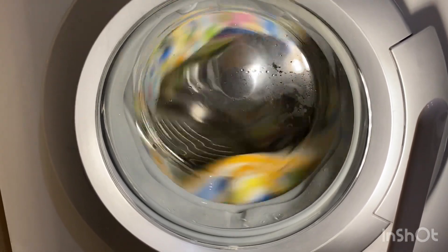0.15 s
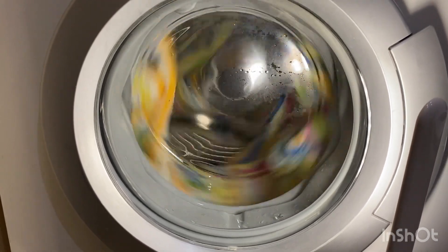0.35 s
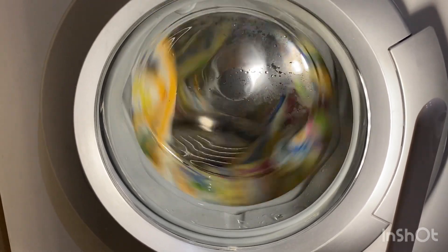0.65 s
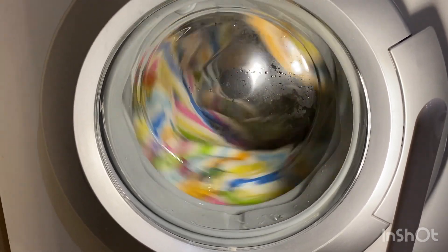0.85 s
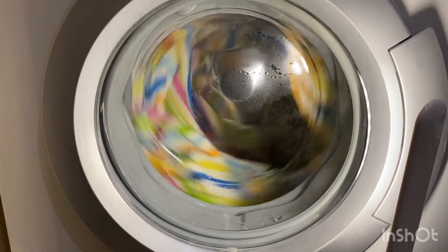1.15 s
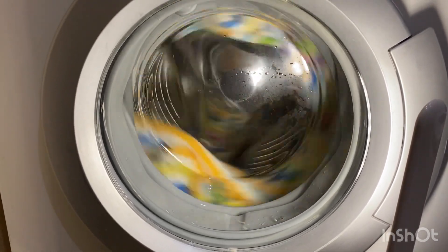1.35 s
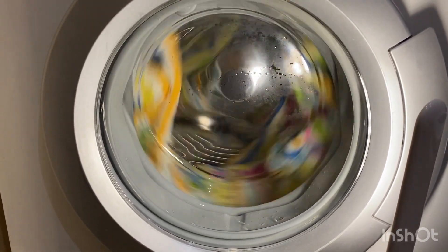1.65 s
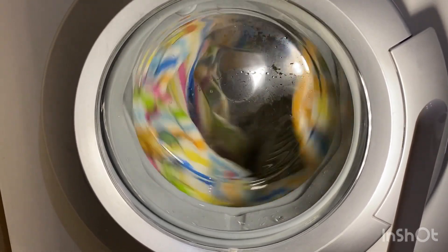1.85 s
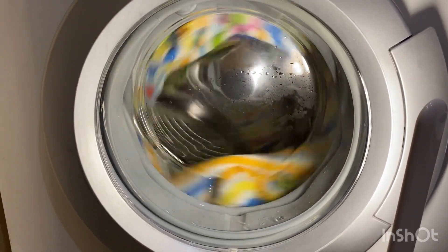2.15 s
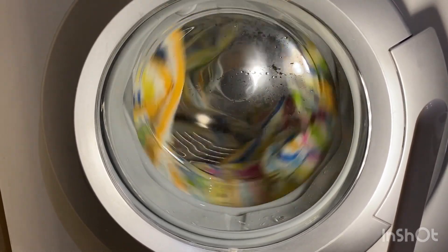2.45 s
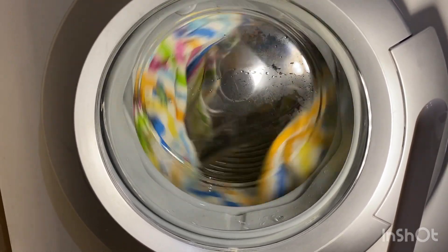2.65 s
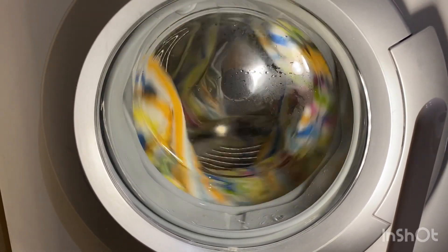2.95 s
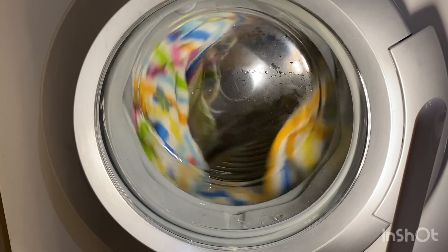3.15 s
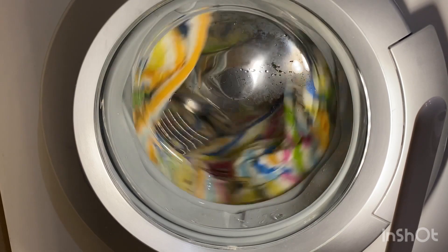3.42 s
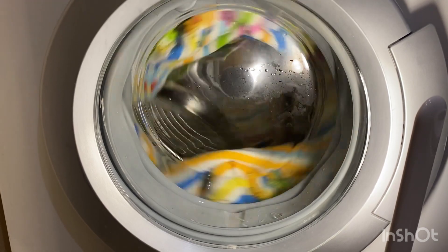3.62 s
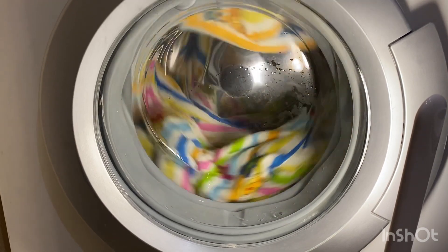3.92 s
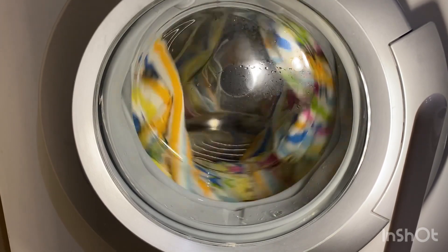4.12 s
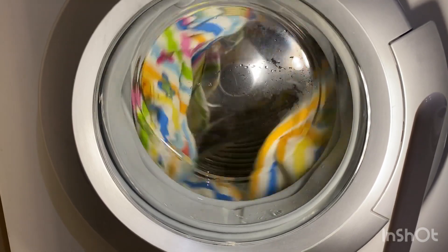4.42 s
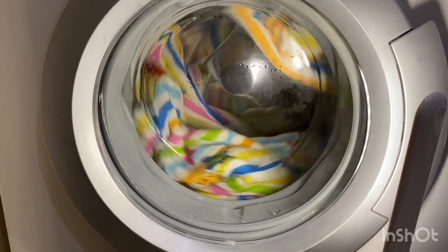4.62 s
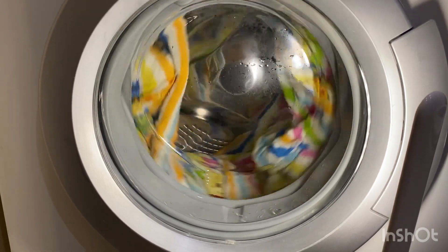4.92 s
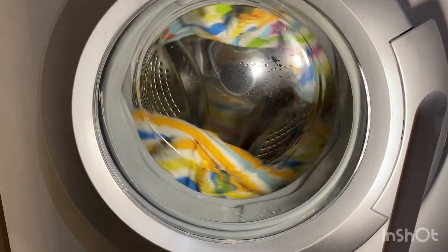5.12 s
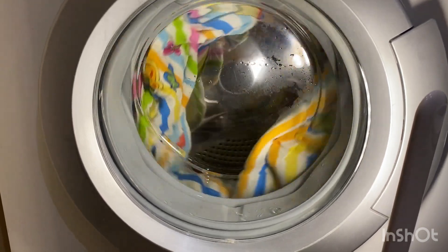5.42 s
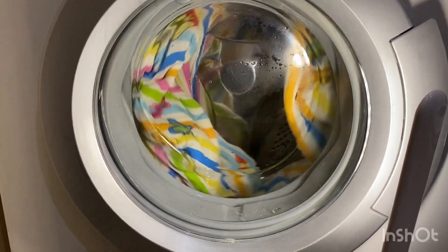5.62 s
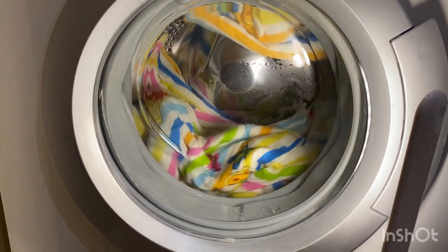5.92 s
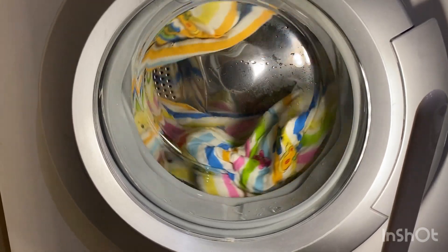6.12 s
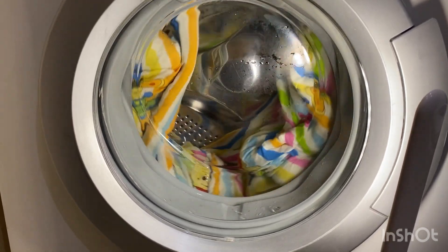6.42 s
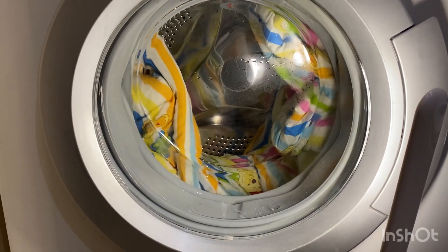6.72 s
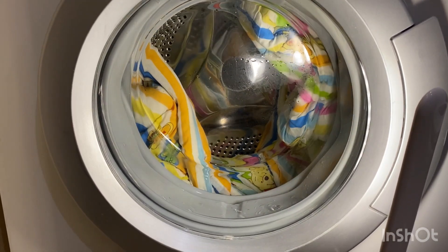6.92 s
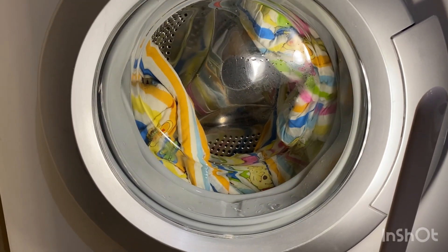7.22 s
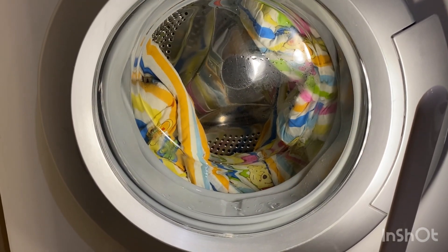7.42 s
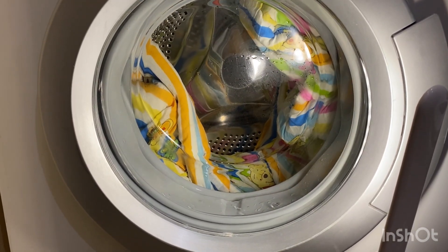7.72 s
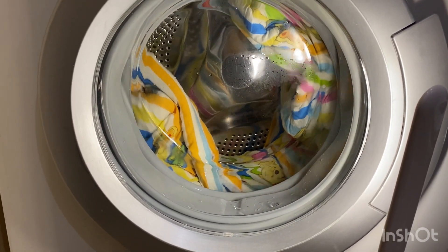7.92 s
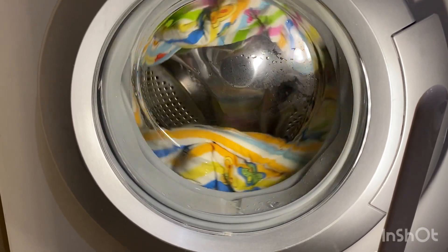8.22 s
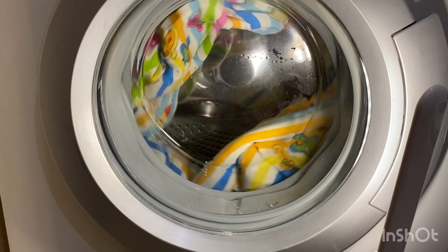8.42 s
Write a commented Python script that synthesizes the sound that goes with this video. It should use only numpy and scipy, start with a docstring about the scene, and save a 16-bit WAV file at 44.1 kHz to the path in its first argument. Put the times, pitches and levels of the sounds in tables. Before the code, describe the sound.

Indoors, close in front of a front-loading washing machine at the end of a spin. From 0 s, a drain pump gives a deep 100 Hz mains hum that swells irregularly, two to four times a second, with each gulp of water; strong gulps near 1.7, 4.4, 7.7 and 8 s add a rough buzz. Between them comes loose rattling. Churning water, brighter gushes and fine bubbly hiss run throughout, with short wet spits near 2.7, 3.4, 4.6, 6.5 and 8 s. Soft hollow tub booms appear near 1.7, 3.9, 5.2 and 6 s. Meanwhile the motor's thin whine and brush hiss glide downward from the start, fading until the drum stops around 6.8 s. The pump continues alone. At 7.57 s a sharp relay snap bounces and rings briefly in the small room; a faint steady 300 Hz hum follows, and the drum slowly turns from 7.9 s to the end at 8.5 s.

```python
"""A drain pump hums on 50 Hz mains, swelling with each gulp of water, amid churning, spray and rattles.
It empties a front-loading washing machine at the end of a spin, heard before its door in a small room.
The drum motor coasts down: shaft-locked tones fall in pitch and the hiss of its brushes fades.
Wet laundry booms in the tub as a narrow resonance; a relay snaps and the drum turns again.
Tones are summed cosines; water, brushes and snap are coloured noise."""
import sys
import numpy as np
from scipy import signal
from scipy.fft import rfft, irfft
from scipy.io import wavfile
from scipy.ndimage import uniform_filter1d

SR = 44100
rng = np.random.default_rng(int(sys.argv[2]) if len(sys.argv) > 2 else 0)


def file_out(sig):
    """Save sig as 16-bit WAV at sys.argv[1]."""
    # one column per channel
    cols = np.atleast_2d(sig).T
    # limit, then scale
    lim = np.clip(cols, -1, 1)
    pcm = np.round(lim * 32767).astype(np.int16)
    wavfile.write(sys.argv[1], SR, pcm)


N = 377496
TIME = np.arange(N) / SR
BINS = np.fft.rfftfreq(N, 1 / SR)
MAINS_HZ = 50.01
MAINS_RAD = 2 * np.pi * MAINS_HZ * TIME

# Cabinet and hose resonances. Each row: frequency in Hz, width in Hz, lift in dB.
CABINET_RESONANCES = [(91.4, 21.6, 14.5), (336.4, 16, 7.5), (352.4, 8.9, 5.5), (430.5, 11, 6),
                      (561, 44, 8.5), (660, 9, 1), (703, 26, 7.5), (753, 8.8, 6), (834, 29, 6),
                      (913.5, 18, 8), (1050, 15, 9), (1090, 16, 7.5), (1360, 235, 6), (1810, 17, 2)]


def gain_of(db):
    """Decibels to an amplitude factor."""
    return 10 ** (np.asarray(db) / 20)


def evened(x):
    """Scale to an rms of 1."""
    return x / np.sqrt(np.mean(abs(x) ** 2) + 1e-20)


def ease(x):
    """Smooth step from 0 to 1 as x goes from 0 to 1."""
    return np.sin(np.pi / 2 * np.clip(x, 0, 1)) ** 2


def swell(start_s, length_s, rise_s, fall_s):
    """Envelope that rises from start_s and falls once length_s has passed."""
    return ease((TIME - start_s) / rise_s) * ease(1 - (TIME - start_s - length_s) / fall_s)


def ring(start_s, t60_s):
    """Exponential decay of a blow at start_s, down 60 dB after t60_s."""
    age_s = np.maximum(TIME - start_s, 0)
    return (TIME >= start_s) * np.exp(-np.log(1000) * age_s / t60_s)


def read(points, hz):
    """Interpolate a spectrum table on a log-frequency axis."""
    point_hz, value = np.transpose(points)
    return np.interp(np.log(hz + 1), np.log(point_hz + 1), value)


def lift_db(resonances, at_hz):
    """Summed lift of resonance peaks at each frequency."""
    return sum(db / (1 + (2 * (at_hz - hz) / width_hz) ** 2) for hz, width_hz, db in resonances)


def curves(rows):
    """Interpolate each column of a time table, sample by sample."""
    s, *columns = np.transpose(rows)
    return [np.interp(TIME, s, column) for column in columns]


def wander(rate_hz):
    """Slow complex noise of about unit rms with a Gaussian spectrum about rate_hz wide."""
    points, end_s = 8192, TIME[-1]
    hz = np.fft.fftfreq(points, end_s / points)
    noise = rng.standard_normal((points, 2)) @ [1, 1j]
    slow = np.fft.ifft(np.fft.fft(noise) * np.exp(-(hz / rate_hz) ** 2 / 2))
    return np.interp(TIME, np.linspace(0, end_s, points), evened(slow))


def spread(pair, colour_db, ripple_db=3.5, ripple_hz=24):
    """Colour two unrelated signals; the room leaves the bass alike at both ears and the treble diffuse."""
    # Each row: frequency in Hz, correlation between the ears.
    ear_likeness = [(60, 1), (130, .99), (290, .9), (640, .5), (1400, .33), (3100, .37), (7000, .22),
                    (9000, 0), (16000, 0)]
    a, b = rfft(pair)
    same = np.clip(read(ear_likeness, BINS), -1, 1)
    mid, side = np.sqrt(1 + same) * a, np.sqrt(1 - same) * b
    # fine, fixed peaks and notches from reflections, different at each ear, strongest in the treble
    width_bins = int(ripple_hz / BINS[1]) + 1
    comb = evened(uniform_filter1d(rng.standard_normal((2, len(BINS))), width_bins))
    comb_db = ripple_db * comb * BINS ** 2 / (BINS ** 2 + 800 ** 2)
    out = irfft(np.array([mid + side, mid - side]) * gain_of(colour_db + comb_db), N)
    return out / out.mean(0).std()


def pump_load():
    """Each gulp fills the pump, holds and drains; the buzz gain falls faster as it needs a full pump."""
    # Gulps of water. Each row: start in s, length in s, filling in s, emptying in s,
    # hum level in dB, buzz level in dB before the buzz trim.
    gulps = [(-0.021, 0.158, 0.169, 0.221, -21.5, -44), (0.197, 0.171, 0.194, 0.2, -21.9, -45.5),
             (0.486, 0.157, 0.21, 0.31, -23.5, -48.5), (0.819, 0.11, 0.078, 0.265, -23, -44.8),
             (1.086, 0.17, 0.102, 0.174, -22, -43.5), (1.29, 0.328, 0.16, 0.128, -26.6, -54.2),
             (1.6, 0.261, 0.17, 0.144, -20, -37.0), (1.894, 0.155, 0.08, 0.14, -23.1, -49),
             (2.098, 0.181, 0.093, 0.074, -27, -57), (2.23, 0.29, 0.246, 0.203, -22, -41),
             (2.724, 0.304, 0.2, 0.056, -25.0, -51.9), (3.011, 0.111, 0.11, 0.149, -26.2, -46.9),
             (3.157, 0.143, 0.112, 0.258, -22.0, -43), (3.377, 0.15, 0.212, 0.21, -28.8, -44.7),
             (3.647, 0.095, 0.081, 0.197, -22.5, -40.4), (3.769, 0.169, 0.188, 0.23, -23.3, -47.1),
             (4.003, 0.34, 0.182, 0.082, -27, -72), (4.299, 0.264, 0.19, 0.148, -20, -37.0),
             (4.594, 0.131, 0.14, 0.332, -21.5, -43.5), (4.918, 0.186, 0.18, 0.16, -22.6, -45.1),
             (5.22, 0.582, 0.286, 0.31, -24.5, -54), (5.578, 0.096, 0.142, 0.115, -26.5, -36.5),
             (5.738, 0.234, 0.059, 0.056, -32.5, -45), (6.023, 0.323, 0.189, 0.253, -23.6, -46),
             (6.405, 0.22, 0.141, 0.27, -23.6, -50.5), (6.677, 0.29, 0.15, 0.33, -22.6, -43.9),
             (7.129, 0.245, 0.175, 0.143, -22.0, -44), (7.41, 0.183, 0.112, 0.167, -24.5, -49),
             (7.634, 0.14, 0.131, 0.361, -20.5, -37.5), (7.917, 0.178, 0.169, 0.218, -20.5, -36),
             (8.145, 0.202, 0.14, 0.194, -23.8, -45.5)]
    load, buzz = 0, 0
    for start_s, length_s, fill_s, empty_s, hum_db, buzz_db in gulps:
        gulp = swell(start_s, length_s, fill_s, empty_s)
        load = load + gain_of(hum_db) * gulp
        buzz = buzz + gain_of(buzz_db) * gulp ** 2
    return load, buzz


def pump_hum(load, swell_db, angle, waver_hz=3.45, tremble_db=0.8, tremble_hz=9, thrum_rad=0.75):
    """The magnet rotor throbs at twice the mains, nearly opposed to the stator's steady hum at light load."""
    # Steady harmonics. Each row: multiple of the mains, level in dB at usual load,
    # dB gained per dB of load, unsteady share.
    harmonics = [(3, -55.5, 0.2, 0.91), (6, -59, -0.9, 0.92), (8, -61.5, 0.1, 0.87),
                 (9, -58.5, -0.07, 0.65), (10, -61, 0.5, 0.43), (12, -60.5, 1.2, 0.98),
                 (14, -65.5, 2.2, 0.77), (16, -65.5, 1.5, 0.16)]
    # Unbalanced rotor, once a turn. Each row: time in s, level in dB at usual load.
    thrum_levels = [(0, -41), (1.3, -39), (2.5, -37.5), (4.5, -37), (8.56, -38)]
    stator_db, stator_rad = -36.5, 2.59
    tremble = gain_of(tremble_db * wander(tremble_hz).real)
    out = load * tremble * np.cos(2 * angle)
    out += gain_of(stator_db) * np.cos(2 * MAINS_RAD + stator_rad)
    thrum_db, = curves(thrum_levels)
    out += gain_of(thrum_db + 0.16 * swell_db) * np.cos(angle + thrum_rad)
    for order, db, follow, unsteady in harmonics:
        waver = evened(1 - min(unsteady, 1) + unsteady * wander(waver_hz))
        tone = waver * np.exp(1j * round(order) * MAINS_RAD)
        out += gain_of(db + follow * swell_db) * tone.real
    return np.sqrt(2) * out


def rotor_buzz(buzz, angle, buzz_trim_db=0.3, buzz_loose=0.36, idle_buzz_db=-52.5, idle_loose=0.99,
               idle_rattle_db=-51, rattle_loose=0.63, rattle_drift_rad=0.88, drift_hz=3.3,
               rise_s=0.041, fall_s=0.13):
    """The rotor has play: under load it knocks its stop, flattening hum crests into a fourth-harmonic buzz.
    In spells it rattles at the fifth harmonic, drifting in and out of step."""
    # Each row: start in s, length in s, level in dB before the idle rattle is added.
    rattles = [(0.454, 0.1, -47.5), (0.777, 0.46, -45.5), (1.442, 0.3, -44.5), (1.95, 0.43, -47),
               (2.787, 0.2, -45), (3.25, 0.21, -57), (4.044, 0.28, -44), (4.587, 0.065, -45),
               (4.878, 0.13, -44.5), (5.354, 0.091, -39.5), (6.086, 0.048, -41.5), (6.418, 0.28, -47.5),
               (7.214, 0.064, -40.5)]
    loaded = gain_of(buzz_trim_db) * buzz * evened(1 + buzz_loose * wander(drift_hz))
    idle = gain_of(idle_buzz_db) * evened(1 + idle_loose * wander(drift_hz))
    fourth = loaded + idle
    spells = sum(gain_of(db) * swell(s, length_s, rise_s, fall_s) for s, length_s, db in rattles)
    unsteady = evened(1 - rattle_loose + rattle_loose * wander(drift_hz))
    fifth = spells + gain_of(idle_rattle_db) * unsteady
    fifth = fifth * np.exp(1j * rattle_drift_rad * wander(drift_hz).real)
    return np.sqrt(2) * (fifth * np.exp(5j * angle) - fourth * np.exp(4j * angle)).real


def chop(depth):
    """The impeller throws water in spurts, once, twice and six times a turn."""
    spurts = np.cos(MAINS_RAD) + .8 * np.cos(2 * MAINS_RAD + 1) + .6 * np.cos(6 * MAINS_RAD)
    return evened(np.exp(depth * spurts))


def churn(extra_db=0, depth=.18):
    """Water beaten by the impeller booms through hose and cabinet: chopped, coloured noise."""
    # Each row: frequency in Hz, relative density in dB per Hz.
    churn_spectrum = [(20, -39), (45, 0), (62, -1.5), (80, -0.5), (120, -2.5), (190, 0.5), (224, 0),
                      (280, 0.5), (340, -2), (385, -8), (600, -8), (900, -6), (990, -17), (1300, -19.5),
                      (3000, -71)]
    drive = rng.standard_normal((2, N)) * chop(depth)
    return spread(drive, read(churn_spectrum, BINS) + lift_db(CABINET_RESONANCES, BINS) + extra_db)


def water(fill, churn_db=-41.0, fill_db=1.5, slosh_db=0.0, slosh_hz=5,
          gush_trim_db=-1, gush_low_hz=430, gush_chop=0.13, gush_rise_s=0.024, gush_fall_s=0.088):
    """Churning grows as the pump fills; gushes into the impeller add brighter bursts that ring the hose."""
    # Each row: start in s, length in s, level in dB before the gush trim.
    gushes = [(0.135, 0.085, -43), (0.33, 0.099, -45.5), (0.562, 0.09, -48.5), (1.663, 0.12, -43.5),
              (1.87, 0.074, -50), (2.43, 0.11, -46), (3.206, 0.09, -47), (3.674, 0.046, -42),
              (3.87, 0.065, -46), (4.38, 0.073, -48), (4.52, 0.07, -48), (5.06, 0.081, -46.5),
              (7.24, 0.079, -45), (7.717, 0.08, -47), (7.93, 0.06, -51), (8.217, 0.1, -47)]
    # Drain hose ringing. Each row: frequency in Hz, width in Hz, lift in dB.
    hose = [(708, 24, 6), (813, 20, 5), (920, 26, 4.5)]
    gush = sum(gain_of(db + gush_trim_db) * swell(s, length_s, gush_rise_s, gush_fall_s)
               for s, length_s, db in gushes)
    highpass = signal.butter(2, gush_low_hz, "highpass", fs=SR, output="sos")
    bright = signal.sosfilt(highpass, churn(lift_db(hose, BINS)))
    level_db = churn_db + fill_db * fill + slosh_db * wander(slosh_hz).real
    return gain_of(level_db) * churn() + gush * evened(bright * chop(gush_chop))


def bubbles(per_s=2600, size_db=1.7, cycles=5, count=24):
    """Many small bubbles, each a few dying cycles at one of count pitches."""
    out, age_s = np.zeros((2, N)), TIME[:SR // 30]
    for hz in np.geomspace(1000, 6000, count):
        pop_count = int(per_s * TIME[-1] / count)
        where, size, left = rng.random((4000, 3))[:pop_count].T
        pop_gain = gain_of(size_db * np.minimum(-np.log(size), 4))
        pops = np.zeros((2, N))
        pops[:, (where * N).astype(int)] = pop_gain * np.sqrt([left, 1 - left])
        ring_out = np.sqrt(hz) * np.exp(-age_s * hz / cycles) * np.sin(2 * np.pi * hz * age_s)
        out += signal.oaconvolve(pops, ring_out[None], axes=1)[:, :N]
    return evened(out)


def spray(spray_db=-47.0, depth=0.02, froth=0.38, body_splutter_db=0.86, fizz_splutter_db=1.02,
          splutter_hz=8):
    """Air and water mix in the pump: hiss with bursting bubbles, its treble spluttering a little more."""
    # Spray, then its finest fizz. Each row: frequency in Hz, relative density in dB per Hz.
    spray_spectrum = [(300, 1.5), (900, 1), (1150, -5.5), (1400, -1.5), (1950, 2.5), (2100, -5), (2300, 2),
                      (2600, -8), (3100, -2), (3400, -4.5), (3900, -6), (5300, -10), (5900, -12)]
    fizz_spectrum = [(7500, -18.5), (9300, -23), (12500, -29.5), (14500, -36.5), (16000, -44)]
    drive = (rng.standard_normal((2, N)) + froth * bubbles()) * chop(depth)
    colour_db = read(spray_spectrum + fizz_spectrum, BINS) + lift_db(CABINET_RESONANCES, BINS)
    hiss = spread(drive, colour_db)
    body = signal.sosfiltfilt(signal.butter(2, 2600, fs=SR, output="sos"), hiss)
    fizz = hiss - body
    splutter = wander(splutter_hz).real
    mix = body * gain_of(body_splutter_db * splutter) + fizz * gain_of(fizz_splutter_db * splutter)
    return gain_of(spray_db) * mix


def spits(width_hz=950, t60_s=0.2):
    """Slugs of water slap the pump housing and ring briefly: decaying band-passed noise."""
    # Each row: time in s, starting level in dB, pitch in Hz.
    slugs = [(0.58, -45, 1760), (2.062, -46, 1450), (2.675, -39, 1510), (3.376, -41.5, 1480),
             (4.576, -43, 1350), (6.495, -42, 1600), (8.039, -43, 1470)]
    out = np.zeros((2, N))
    for s, db, hz in slugs:
        band_hz = [hz - width_hz / 2, hz + width_hz / 2]
        housing = signal.butter(2, band_hz, "bandpass", fs=SR, output="sos")
        slap = signal.sosfilt(housing, rng.standard_normal((2, N)))
        out += gain_of(db) * evened(slap) * ring(s, t60_s)
    return out


def booms(tub_hz=326, width_hz=19, rise_s=0.066, fall_s=0.086):
    """Slumping laundry sets one narrow resonance of the tub going."""
    # Each row: start in s, length in s, level in dB.
    slumps = [(0.19, 0.12, -48), (1.66, 0.07, -47.5), (3.85, 0.18, -45), (5.16, 0.16, -47.5),
              (5.96, 0.2, -48), (8.41, 0.14, -49)]
    level = sum(gain_of(db) * swell(s, length_s, rise_s, fall_s) for s, length_s, db in slumps)
    return np.sqrt(2) * level * (wander(width_hz) * np.exp(2j * np.pi * tub_hz * TIME)).real


def motor_whine(speed, fade=0.68, flutter=.6, flutter_hz=7):
    """Shaft-locked tones sink and fade; each surfaces as it sweeps through a resonance of the frame."""
    # Imbalance, bearing, rotor slot and commutator tones: multiples of the shaft speed.
    orders = [2, 4.61, 4.9, 24, 26, 36, 38, 48, 50]
    # Their levels in dB at top speed, away from resonance.
    orders_db = [-57, -66.5, -61, -67, -73, -74.5, -77, -74.5, -77]
    # Motor frame and tub. Each row: frequency in Hz, width in Hz, lift in dB.
    frame = [(277, 14, 10), (455, 22, 6), (497, 22, 10.5), (550, 24, 3), (655, 34, 11), (2245, 100, 5),
             (2530, 60, 5.5), (2700, 70, 5), (2825, 40, 7), (2965, 95, 9.5), (3110, 130, 12),
             (3390, 120, 8), (3490, 70, 4), (4430, 340, 13), (5400, 220, 6), (6800, 650, 9)]
    angle = 2 * np.pi * np.cumsum(speed) / SR
    out = np.zeros((2, N))
    for order, db in zip(orders, orders_db):
        # uneven running smears the high orders most
        direct = 1 + order / 70 * wander(order * .7)
        tone = gain_of(db + lift_db(frame, order * speed)) * np.exp(1j * order * angle)
        for ear in range(2):
            # room modes make the tone flutter, differently at each ear
            out[ear] += (tone * evened(direct + flutter * wander(flutter_hz))).real
    return np.sqrt(2) * out * (speed / speed.max()) ** fade


def brushes(speed, repeating=0.4):
    """Carbon brushes hiss on the commutator; part of the scraping repeats with every turn."""
    # Each row: shaft speed in turns per second, hiss level in dB.
    brush_levels = [(0, -67), (40, -65), (80, -61.5), (115, -57.5), (148, -54.5)]
    # Each row: frequency in Hz, relative density in dB per Hz.
    brush_spectrum = [(1000, -18), (2200, 0), (3100, 2), (4500, 0), (6000, -1.5), (7000, .5), (8500, -2.5),
                      (12400, -4), (14000, -6), (15500, -10), (16400, -24)]
    # Brush holder ringing. Each row: frequency in Hz, width in Hz, lift in dB.
    holders = [(10950, 600, 5), (12200, 900, 5)]
    fine = signal.resample(rng.standard_normal((2, 256)), 8192, axis=1)  # surface round one turn
    turn = np.cumsum(speed) / SR % 1
    scrape = fine[:, (turn * fine.shape[1]).astype(int)] * speed / speed.max()
    drive = rng.standard_normal((2, N)) + repeating * scrape
    hiss = spread(drive, read(brush_spectrum, BINS) + lift_db(holders, BINS))
    return hiss * gain_of(np.interp(speed, *np.transpose(brush_levels)))


def relay(rise_s=0.0017, snap_t60_s=0.045, room_t60_s=0.19, room_db=-10,
          panel_hz=1120, panel_peak_db=-42.5, panel_t60_s=0.12):
    """The motor relay closes and bounces: a ringing noise snap, a panel tone and the small room's tail."""
    # Each row: time in s, level in dB before the room tail is added.
    contacts = [(7.5666, -36), (7.5735, -46), (7.586, -55)]
    # Each row: frequency in Hz, relative density in dB per Hz.
    snap_spectrum = [(500, -15), (1120, 8), (2000, 0), (3000, 3), (4500, 2.5), (5600, 0), (7000, -4),
                     (8500, -5), (11300, -5.5), (13000, -5), (14500, -7.5), (16400, -17)]
    # Armature and case ringing. Each row: frequency in Hz, width in Hz, lift in dB.
    case_rings = [(6330, 330, 12), (7600, 400, 8), (9500, 700, 7), (12850, 700, 10)]
    power = 0
    for s, db in contacts:
        tail = gain_of(room_db) * ring(s, room_t60_s)
        power = power + gain_of(db) ** 2 * (ring(s, snap_t60_s) ** 2 + tail ** 2)
    close_s = contacts[0][0]
    colour_db = read(snap_spectrum, BINS) + lift_db(case_rings, BINS)
    noise = spread(rng.standard_normal((2, N)), colour_db)
    snap = np.sqrt(power) * ease((TIME - close_s) / rise_s) * noise
    panel = gain_of(panel_peak_db) * ring(close_s, panel_t60_s) * np.sin(2 * np.pi * panel_hz * TIME)
    return snap + panel


def drive_hum(hum_db=-51.5, start_s=7.6, rise_s=0.15, waver=0.34):
    """Once the relay has closed, the motor windings hum on the sixth harmonic of the mains."""
    tone = evened(1 + waver * wander(3)) * np.exp(6j * MAINS_RAD)
    return np.sqrt(2) * gain_of(hum_db) * ease((TIME - start_s) / rise_s) * tone.real


def scene():
    """Pump, water, tub, motor and relay together."""
    # Drum motor. Each row: time in s, speed in turns per second.
    shaft = [(0, 148.0), (1, 124.4), (2, 101.6), (3, 79.6), (5, 38), (6.8, 0), (7.85, 0), (8.2, 11),
             (8.56, 12)]
    dry_db = -42  # load left when the pump runs dry
    lag_rad = 4.3  # rotor's lag behind the mains per unit of load
    load, buzz = pump_load()
    load_db = 20 * np.log10(load + gain_of(dry_db))
    swell_db = load_db - np.median(load_db)
    fill = gain_of(swell_db) - 1  # 0 at the usual load, lower when emptier
    angle = MAINS_RAD - lag_rad * load  # of the pump rotor
    speed, = curves(shaft)
    pump = pump_hum(load, swell_db, angle) + rotor_buzz(buzz, angle)
    pump = pump + water(fill) + spray() + spits()
    return pump + booms() + motor_whine(speed) + brushes(speed) + relay() + drive_hum()


def record(dry, alike_hz=6200, in_step_hz=7000, lag_s=.000241, edge_hz=15900):
    """Deep bass is cut, the left-right balance varies with frequency and the band is limited.
    The top treble is nearly the same in both channels, a little later on the left."""
    # Each row: frequency in Hz, left minus right in dB.
    lean = [(60, 4.5), (110, 1), (200, 2), (380, 4.5), (700, 3.5), (1290, -0.5), (2380, -4), (4400, 3),
            (8120, 1.5), (15000, 1)]
    lean_db = read(lean, BINS) / 2
    bass_cut = BINS ** 4 / np.hypot(BINS ** 4, 32 ** 4)
    left, right = rfft(dry) * bass_cut
    # crossfade 1 kHz wide: above it the left is the right, later by lag_s, in phase at in_step_hz
    alike = ease((BINS - alike_hz) / 1000 + .5)
    late = right * np.exp(-2j * np.pi * (BINS - in_step_hz) * lag_s)
    left = np.sqrt(1 - alike ** 2) * left + alike * late
    heard = irfft(np.array([left, right]) * gain_of([lean_db, -lean_db]), N)
    lowpass = signal.firwin(511, edge_hz, window=("kaiser", 9), fs=SR)
    return signal.oaconvolve(heard, lowpass[None], "same")


dry = scene()
out = record(dry)
file_out(out)
```